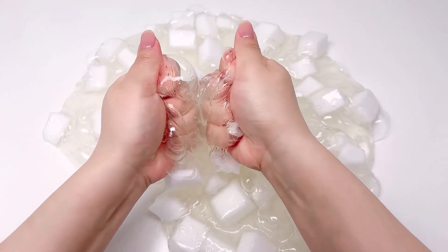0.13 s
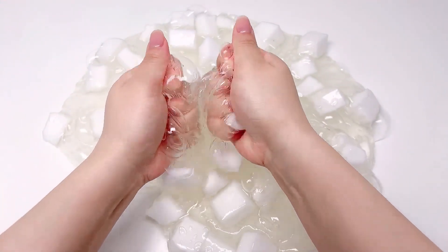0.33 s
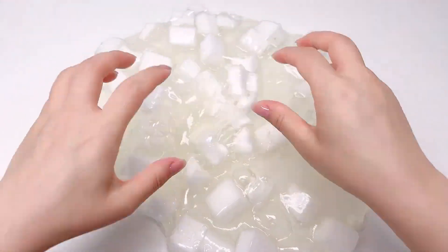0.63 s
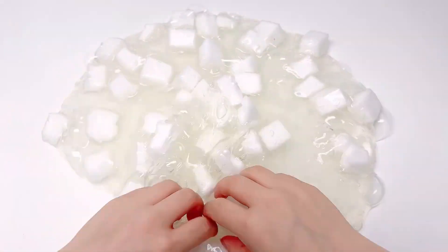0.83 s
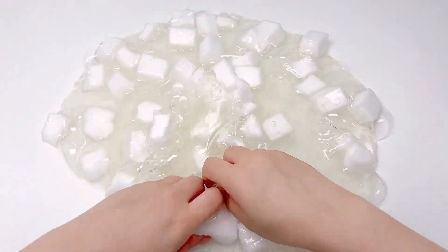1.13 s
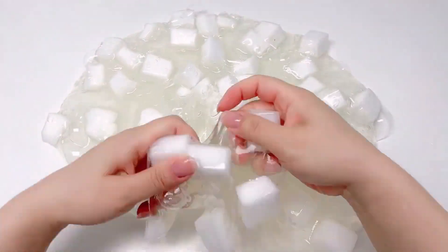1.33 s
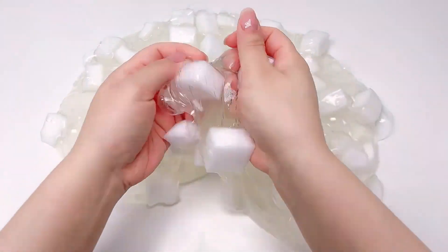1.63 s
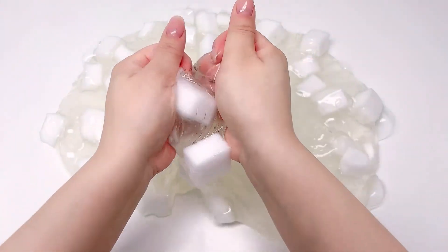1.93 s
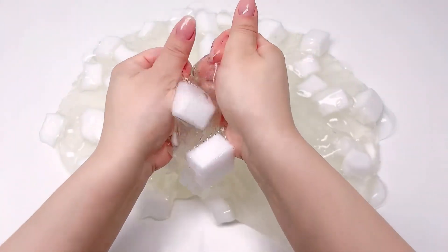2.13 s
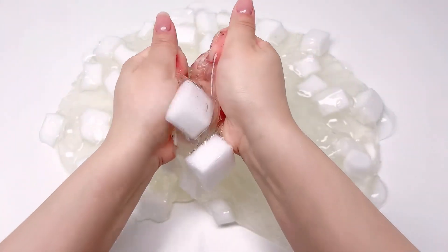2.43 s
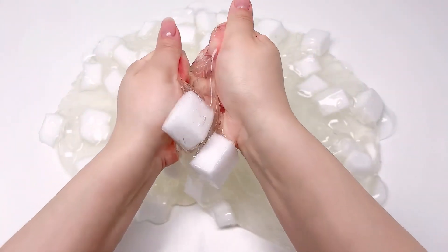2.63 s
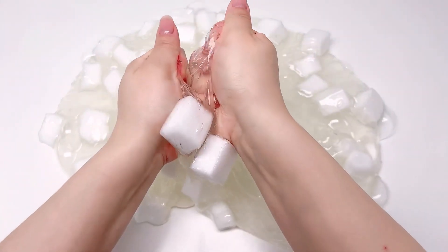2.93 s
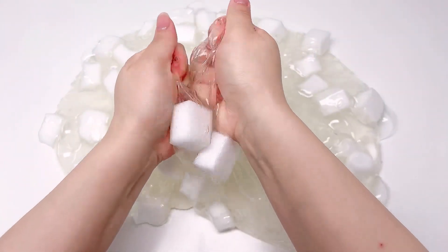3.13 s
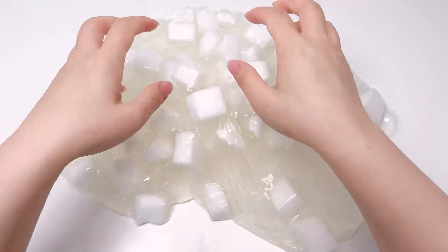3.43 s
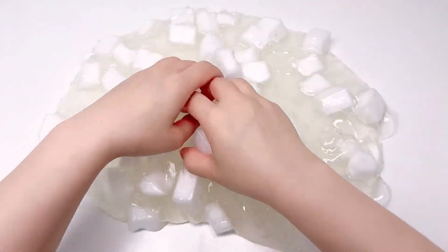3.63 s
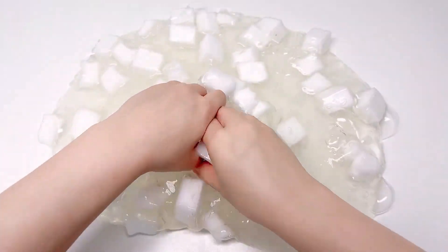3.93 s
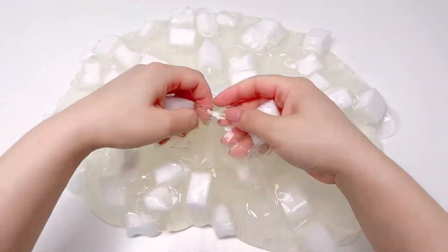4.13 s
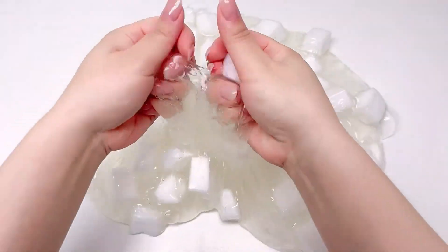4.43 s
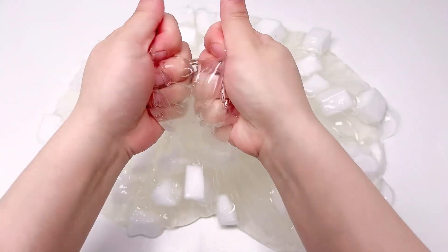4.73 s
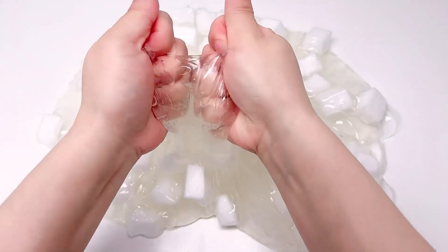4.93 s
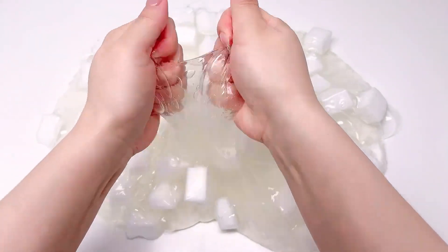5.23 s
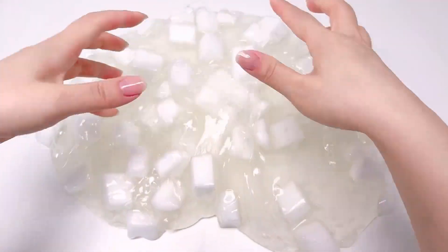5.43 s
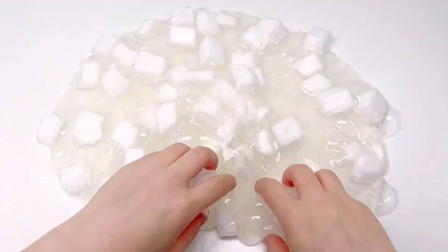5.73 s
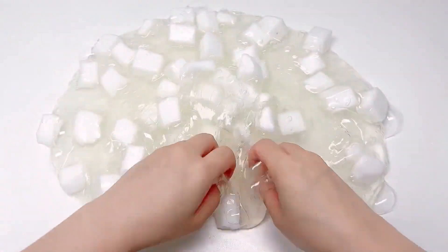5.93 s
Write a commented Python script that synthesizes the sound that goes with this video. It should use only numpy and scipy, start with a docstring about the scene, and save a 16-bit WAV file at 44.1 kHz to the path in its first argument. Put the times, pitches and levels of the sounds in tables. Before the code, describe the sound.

A wet, fizzing squelch opens as hands crush sponge pieces full of slime, heard close in a small, quiet room. Faint sticky crackles, little pops and dull finger bumps on the table follow. A second squeeze spits and pops sharply, then after another lull a third swells with bubbly chirps and hiss. A couple of pops and soft knocks finish it, with faint room hum underneath.

```python
"""Two hands squeeze slime-soaked sponge cubes over a table, close up in a small room.
0-0.6 s: a squeeze forces air through the wet foam; it hisses, sputters and whistles in the hollows
between the fingers, and slime bubbles burst. Then slime clings and ticks, fingers knock the table.
2.3-3.4 s: second squeeze, then another lull of cling, pops and knocks. 4.6-5.6 s: third squeeze.
Cling, two pops and two knocks close the scene. Room tone and house rumble run throughout."""
import sys
import numpy as np
from scipy import signal
from scipy.fft import rfft, irfft, next_fast_len
from scipy.io import wavfile
from scipy.ndimage import uniform_filter1d, map_coordinates

SR = 44100
rng = np.random.default_rng(int(sys.argv[2]) if len(sys.argv) > 2 else 0)


def wrap_up_sound(samples):
    """Save the sound to the file named by the first command line argument, as 16-bit audio."""
    columns = np.atleast_2d(samples).T
    # keep every value between -1 and 1, then stretch to whole-number steps
    tamed = np.clip(columns, -1, 1)
    steps = np.round(tamed * 32767).astype(np.int16)
    wavfile.write(sys.argv[1], SR, steps)


N = 267995

# air flow, one list per grip: time_s, flow_db
JET_FLOWS = [
    [(0, -10), (.042, -13), (.088, -16.5), (.098, -13.5), (.145, -17.5)],
    [(.145, -13), (.455, -19.5)],
    [(.455, -22), (.459, -18.5), (.523, -30), (.527, -26), (.581, -55.5), (.62, -44.5)],
    [(2.262, -39), (2.266, -29), (2.318, -43), (2.326, -15), (2.345, -48.5)],
    [(2.345, -47.5), (2.365, -5.5), (2.403, -26), (2.585, -51)],
    [(2.585, -36.5), (2.607, -26), (2.635, -36.5), (2.691, -33.5), (2.698, -18.5)],
    [(2.7, -1), (2.712, -22.5), (2.83, -26.5)],
    [(2.83, -23.5), (2.858, -22), (2.91, -17), (3.136, -23.5), (3.292, -19.5), (3.308, -23.5), (3.318, -41),
     (3.35, -33.5), (3.42, -64.5)],
    [(4.58, -70), (4.588, -43.5), (4.612, -36), (4.686, -25.5), (4.754, -23.5), (4.83, -28.5)],
    [(4.83, -29), (4.85, -17.5), (4.99, -14)],
    [(4.99, -12), (5.06, -13), (5.125, -21.5)],
    [(5.125, -20.5), (5.137, -10.5), (5.167, -20), (5.28, -35.5)],
    [(5.28, -38.5), (5.326, -22), (5.346, -26.5), (5.385, -46.5)],
    [(5.385, -49), (5.407, -16.5), (5.439, -26.5), (5.6, -59)],
]
# jet colour set by foam and grip, one list per jet: freq_hz, density_db
JET_SPECTRA = [
    [(180, -64.5), (300, -33.5), (1450, -15.5), (1660, -5), (1890, -21.5), (2200, -16), (2860, -2.5),
     (4260, -25.5), (10300, -19), (15800, -21.5)],
    [(180, -50.5), (300, -20.5), (545, -20.5), (974, -5.5), (1500, -6.5), (1710, -3.5), (2160, -5.5),
     (2910, 1), (6140, -4.5), (6560, -2), (12700, -6), (14500, -2.5), (15800, -1.5)],
    [(180, -64), (300, -29.5), (1450, -5.5), (1680, -12), (2200, -23), (3060, 0), (3490, -9.5),
     (7370, -14.5), (15800, -12)],
    [(180, -56), (300, -26), (1550, -25.5), (1920, -20), (3160, 3), (3730, -18.5), (11000, -6.5),
     (15800, -40.5)],
    [(180, -47.5), (300, -15), (425, -11), (462, -18), (510, -12), (1270, -22.5), (3860, -5.5), (4190, -15),
     (4950, -7.5), (15800, -33)],
    [(180, -59), (300, -27), (372, -19), (554, -16), (853, 7), (1060, 1.5), (2630, 7), (8990, -7),
     (15800, 4)],
    [(180, -46.5), (300, -11), (676, -13), (825, -10.5), (1060, -0.5), (1190, -2.5), (2160, -13.5),
     (3380, -6), (15800, -15.5)],
    [(180, -59), (300, -28), (469, -25), (665, -4), (812, -1.5), (1360, -0.5), (2200, -6), (3210, -2.5),
     (7250, -13.5), (14800, -15.5), (15800, -16)],
    [(180, -50.5), (300, -27.5), (469, -43), (825, -24.5), (2230, -29), (2470, -19.5), (3380, -17),
     (4260, -12), (6560, -26.5), (7130, -24.5), (15800, -28)],
    [(180, -65), (300, -27.5), (1190, -9.5), (1400, -14), (1740, -8), (2160, -14), (2820, -4.5),
     (3160, -10.5), (5940, -10.5), (10300, -7), (15800, -18)],
    [(180, -57), (300, -14), (772, -15), (958, -10), (1170, -13), (1710, -7.5), (3380, -9), (3860, -11),
     (4550, -15.5), (7740, -6), (15800, -12)],
    [(180, -69), (300, -43), (425, -11), (536, -25.5), (723, -14), (1520, -12.5), (3160, -5.5), (4190, -8),
     (15800, -12.5)],
    [(180, -58), (300, -40), (1060, -21.5), (1660, -13), (1950, -11.5), (2820, -2.5), (4550, -21),
     (10100, -16.5), (15800, -22.5)],
    [(180, -41), (300, -29), (536, -25.5), (1450, -8), (1920, -19.5), (2860, -5), (3110, -9.5),
     (7370, -3.5), (15800, -19.5)],
]
# treble change from start to end, one per jet: drift_db
JET_DRIFTS_DB = [1.5, 1.5, -2.5, -1, -7, -5, -1.5, -6.5, 5, 2.5, 3, -2.5, 1.5, -5]
# hollows between the fingers, one list each: time_s, pitch_hz, level_db
FINGER_HOLLOWS = [
    [(0, 2880, -17), (.046, 2937, -12.5), (.076, 2890, -21.5), (.098, 2874, -13.5), (.138, 2960, -5.5),
     (.148, 2862, -45)],
    [(0, 1648, -20.5), (.114, 1654, -20.5), (.182, 1720, -41.5), (.315, 1676, -40), (.324, 1695, -23),
     (.34, 1723, -40), (.455, 1735, -44), (.462, 1710, -20), (.485, 1709, -35), (.495, 1674, -22),
     (.52, 1620, -33)],
    [(0, 10300, -25.5), (.075, 10560, -21.5), (.09, 10500, -35.5), (.11, 10150, -19), (.155, 10500, -23)],
    [(2.265, 5710, -24.5), (2.272, 4710, -30.5), (2.282, 3220, -31.5), (2.3, 3064, -30), (2.325, 2480, -36)],
    [(2.71, 792, -19.5), (2.758, 846, -35), (2.788, 1114, -49), (2.956, 1011, -28.5), (3.036, 919, -29.5),
     (3.114, 1096, -35)],
    [(4.585, 3040, -42.5), (4.635, 2375, -37.5), (4.66, 2572, -24.5), (4.7, 2774, -21), (4.75, 2367, -37)],
    [(4.6, 3400, -32), (4.635, 4080, -23.5), (4.655, 4318, -17), (4.675, 3900, -12), (4.695, 4480, -20.5),
     (4.76, 3740, -41)],
    [(4.585, 4000, -42.5), (4.61, 6450, -27), (4.67, 6410, -27), (4.71, 5180, -25), (4.76, 4900, -47)],
    [(4.9, 11000, -20.5), (4.93, 10000, -19), (4.96, 8500, -22.5), (5.0, 7900, -22.5)],
    [(5.055, 9200, -14.5), (5.068, 7800, -10), (5.08, 5940, -20), (5.092, 4830, -17)],
]
# pockets that open and shut: peak_s, rise_s, fall_s, first_hz, last_hz, level_db
POCKET_CHIRPS = [(.004, 0.0036, .06, 1056, 1280, -20.5), (.12, .15, .12, 3450, 3250, -20),
                 (.25, 0.22, .2, 5236, 5200, -27), (.555, .03, 0.015, 1038, 1050, -32.5),
                 (2.21, 0.045, 0.082, 4550, 6800, -44), (2.3, 0.027, 0.026, 2900, 1600, -29.5),
                 (2.367, 0.0058, 0.011, 4990, 5100, -7), (2.39, 0.018, .2, 4960, 4950, -31.5),
                 (2.703, .003, 0.0065, 810, 814, -7), (3.264, .04, 0.022, 749.5, 686, -22.5),
                 (4.63, .04, .07, 5600, 5200, -27.5), (4.701, 0.072, .06, 5600, 4700, -24.5),
                 (4.67, .06, .07, 3300, 3500, -26.5), (4.826, .006, 0.0092, 2200, 2294, -18.5),
                 (4.79, .05, .05, 8250, 8200, -22.5), (4.848, .03, 0.007, 2495, 2450, -7),
                 (4.845, 0.017, .004, 3510, 3050, -10), (4.87, 0.027, .05, 7430, 6200, -17.5),
                 (4.866, 0.0057, .08, 3768, 3700, -19.5), (4.893, 0.0023, 0.043, 1745, 2050, -23),
                 (4.905, .03, 0.047, 693.1, 1150, -23.5), (4.968, 0.049, .006, 1110, 1260, -20.5),
                 (4.96, 0.066, .015, 1200, 1800, -22.5), (4.978, .1, .06, 2845, 2880, -15),
                 (4.999, .003, .02, 873, 1300, -18), (5.0, .004, 0.065, 1744, 1500, -21.5),
                 (5.036, .01, 0.027, 1657, 1800, -15), (5.04, 0.014, .06, 1297, 1580, -19),
                 (5.04, 0.1, 0.067, 439, 650, -40), (5.055, 0.11, .01, 9350, 9150, -14),
                 (5.058, .016, 0.023, 2930, 2780, -11.5), (5.068, .014, .03, 3860, 3920, -9),
                 (5.07, .005, 0.085, 15000, 10000, -21.5), (5.133, .006, .006, 1707, 3370, -6),
                 (5.14, .005, 0.019, 3165, 3180, -8), (5.32, .08, 0.045, 2840, 2760, -30),
                 (5.393, .003, .025, 1414, 1450, -31), (5.432, .006, 0.017, 1640, 1350, -23),
                 (5.925, .05, .04, 1437, 1440, -33)]
# bursting bubbles: start_s, level_db, pocket_hz, body_db, crack_db (last two relative to level_db)
BUBBLE_POPS = [(.099, -5, 2920, -16.5, -15.5), (.459, -14.5, 1730, -7.5, -20), (.46, -12.5, 2990, -20, -14),
               (.528, -11.5, 7580, -20, 2), (.66, -30.5, 8350, -9.5, -6), (.687, -23, 6690, -24.5, -18.5),
               (.746, -29.5, 3840, 1, -9.5), (.763, -28.5, 3620, 3.5, -3.5), (1.075, -21.5, 6220, -11, -16),
               (1.121, -29.5, 760, 1.5, -4), (1.159, -34, 988, -10, -24.5), (1.227, -37, 5290, -1, -14.5),
               (1.255, -32.5, 2514, -9, -19.5), (1.345, -31.5, 5600, 5, -9),
               (1.353, -21.5, 1589, -3.5, -20.5), (1.366, -27, 1500, -5, -10),
               (1.503, -38, 6000, -8, -15.5), (1.536, -35.5, 2490, -10, -20),
               (1.635, -35.5, 1874, 10.5, -14), (1.735, -31.5, 1417, -7.5, -23.5),
               (1.831, -33, 3793, 4.5, -17), (1.864, -30, 4040, -1.5, -24.5),
               (1.974, -31.5, 1880, -11, -17), (2.065, -19.5, 5960, -6, -18),
               (2.133, -17, 6200, -21.5, -14), (2.187, -24.5, 8480, -16.5, 1), (2.266, -17, 5600, 1, -20),
               (2.325, -9.5, 3950, 8.5, -5), (2.357, -12.5, 2940, -1.5, -4), (2.363, -1, 4997, -7.5, -4),
               (2.588, -19.5, 6080, -4.5, -2.5), (2.604, -11.5, 3147, -11.5, -26.5),
               (2.699, -11.5, 844, -15, 3.5), (2.832, -1, 1810, 3, 4.5), (2.892, -5.5, 2662, -1, -3.5),
               (2.902, -3.5, 3125, -22.5, 4), (3.224, -11.5, 1663, -18.5, -25.5),
               (3.304, -2.5, 7160, -26, -19), (3.349, -10.5, 3941, -34, -26), (3.493, -31, 1065, -1, -21),
               (3.523, -27.5, 1050, 0, -8), (3.764, -34.5, 1990, -19, -11.5), (3.78, -36, 920, 7, 9.5),
               (3.866, -24, 910, -16, -27.5), (3.936, -29.5, 3900, -20, -19), (4.04, -38, 3510, -18, -23),
               (4.098, -40.5, 2500, 9.5, -21.5), (4.164, -30, 3410, 2, -15), (4.238, -38, 942.2, 4, 0),
               (4.297, -37.5, 2060, 6, -19), (4.378, -35, 3010, 4.5, -18.5),
               (4.419, -32.5, 9750, -14, -2.5), (4.49, -34.5, 6736, -3, -5.5), (4.596, -27, 5110, -25, -4),
               (4.61, -19.5, 2950, -23, -14), (4.684, -9.5, 4440, -17, -22),
               (4.835, -12, 2500, -5.5, -21.5), (4.847, -5, 2406, -17.5, -22), (5.13, -20, 3160, 7, -14.5),
               (5.296, -26.5, 2860, -15, -19), (5.316, -24, 2890, -10, -14), (5.34, -28.5, 2750, 10, -14.5),
               (5.396, -10, 9300, -11, -17.5), (5.408, -17.5, 6180, -11, -24.5),
               (5.466, -15, 2920, -21.5, -18.5), (5.602, -12.5, 1784, -4, -14.5),
               (5.881, -11.5, 580, 3.5, -29)]
# fingers meeting the table: start_s, level_db, contact_ms
FINGER_KNOCKS = [(0.768, -22, 7.9), (0.983, -37, 2.9), (1.075, -29.5, 6.9), (1.127, -39.5, 0.73),
                 (1.357, -30, 5.5), (2.325, -27, 1.2), (3.552, -20.5, 11), (3.872, -30.5, 4.2),
                 (5.603, -17, 5), (5.885, -15, 1.6)]
# table top modes: freq_hz, level_db, t60_s
TABLE_MODES = [(76, -19.5, .15), (115.78, -2, 0.19), (191.04, -10.5, 0.32), (254, -4, 0.27135),
               (351, -7, 0.12), (523, -6, 0.22)]
# slime pulling off skin, one list per lull: time_s, level_db, treble_db
CLING_SPANS = [
    [(.5, -37.5, 0), (.78, -49, -9.5), (.908, -57.5, -6.5), (1.2, -47, -6), (1.934, -51.5, -8.5),
     (2.072, -66.5, 10), (2.27, -46, -8)],
    [(3.36, -46.5, 14.5), (3.552, -50, -5.5), (3.77, -68.5, 5), (4.016, -53, -2.5), (4.6, -54.5, 1)],
    [(5.5, -43.5, 5.5), (5.668, -62, 8), (5.998, -47, -13), (6.077, -56, -8.5)],
]
# colour of that rustle: freq_hz, density_db
CLING_SPECTRUM = [(290, -11), (500, -26.5), (783, 2.5), (1170, -1), (1460, 1), (1610, -62.5), (1680, -0.5),
                  (3890, -5), (15800, -9.5)]
# room decay: freq_hz, t60_s
ROOM_DECAY = [(200, 0.43), (2000, 0.3), (6000, .28), (14000, 0.14)]
# house rumble envelope: time_s, level_db
RUMBLE_LEVELS = [(0, -44), (.44, -48.5), (.83, -45), (2.05, -48), (2.35, -44.5), (3.08, -46), (3.52, -48.5),
                 (3.7, -41.5), (4.37, -42), (4.7, -53), (4.99, -43), (5.3, -48), (6.08, -40)]
# house rumble colour: freq_hz, density_db
RUMBLE_SPECTRUM = [(12, -38.5), (20, -17.5), (48, 6), (62, 0), (80, -13.5), (110, -7), (140, -27),
                   (240, -120)]
# room tone colour: freq_hz, density_db
TONE_SPECTRUM = [(53, -18.5), (90, -5.5), (151, -3.5), (238, -10), (375, -0.5), (466, -10), (971, -17),
                 (2160, -26.5), (3190, -25), (7250, -30.5), (11900, -56), (14500, -36.5), (15800, -25.5)]

TREBLE_DB_PER_FLOW_DB = .03
CHIRP_SWELL_DB = 19.5  # peak above both ends
BLIPS_PER_S, BLIP_FALL_S, BLIP_MAX_DB = 60, .03, -14.5  # level relative to flow
POP_T60_S, FIZZ_T60_S, FIZZ_DB = .022, .38, -22.5  # level relative to splat
TONE_DB, TOP_HZ = -51, 15900


def jets():
    """Air driven out of the foam; stronger flow hisses brighter."""
    out = np.zeros(N)
    for rows, spectrum, drift_db in zip(JET_FLOWS, JET_SPECTRA, JET_DRIFTS_DB):
        start, flow_db = curves(rows)
        size = len(flow_db)
        treble_db = TREBLE_DB_PER_FLOW_DB * (flow_db - flow_db.max())
        treble_db += drift_db * np.linspace(-.5, .5, size)
        hiss = coloured(sputter(size, spit_db=1, patchy_db=3, snap_gain=4.4), spectrum)
        out[start:][:size] += amp(flow_db) * brightened(hiss, treble_db) * edge_fade(size)
    return out


def whistles():
    """Turbulence in hollows and pockets: narrow noise around a pitch set by their size."""
    out = np.zeros(N)
    chirps = [chirp_track(*row) for row in POCKET_CHIRPS + blips()]
    for rows in FINGER_HOLLOWS + chirps:
        start, pitch_hz, level_db = curves(rows)
        size = len(pitch_hz)
        width_hz = 70 * (np.mean(pitch_hz) / 3000) ** 1.6  # small hollows whistle less purely
        drive = filtered(rng.standard_normal((2, size)), lambda hz: 1 / (1 + (hz / width_hz) ** 2))
        gate = amp(4 * np.tanh(7 * wobble(size, 70)))  # a slime film shuts and reopens the mouth
        phase = 2 * np.pi * np.cumsum(pitch_hz * (1 + .015 * wobble(size, 120))) / SR
        whistle = drive[0] * np.cos(phase) + drive[1] * np.sin(phase)
        out[start:][:size] += amp(level_db) * unit_rms(gate * whistle) * edge_fade(size)
    return out


def chirp_track(peak_s, rise_s, fall_s, first_hz, last_hz, level_db):
    """A pocket opens and shuts: one swell on a linear glide, rows as in FINGER_HOLLOWS."""
    peak_hz = first_hz + (last_hz - first_hz) * rise_s / (rise_s + fall_s)
    end_db = level_db - CHIRP_SWELL_DB
    return [(peak_s - rise_s, first_hz, end_db), (peak_s, peak_hz, level_db),
            (peak_s + fall_s, last_hz, end_db)]


def blips():
    """Small pockets chirp at random while air flows; rows as in POCKET_CHIRPS."""
    rows = []
    for jet in JET_FLOWS:
        time_s, flow_db = np.transpose(jet)
        span_s = time_s[-1] - time_s[0]
        for when, pitch, glide, softness in rng.random((int(BLIPS_PER_S * span_s), 4)):
            peak_s = time_s[0] + when * span_s
            first_hz = 800 * 6.5 ** pitch
            last_hz = first_hz * (.85 + .4 * glide)
            level_db = np.interp(peak_s, time_s, flow_db) + BLIP_MAX_DB - 8 * softness
            rows.append((peak_s, BLIP_FALL_S / 3, BLIP_FALL_S, first_hz, last_hz, level_db))
    return rows


def pops():
    """A film tears with a crack and a wet splat; the pocket rings, the torn slime fizzes on."""
    out, t = np.zeros(N + SR), np.arange(SR // 4) / SR
    body_band = signal.butter(2, [700, 5000], "band", fs=SR)
    crack_band = signal.butter(2, [6000, 14000], "band", fs=SR)
    pop_env = amp(-60 * t / POP_T60_S) * (1 - np.exp(-t / .00065))
    fizz_env = amp(FIZZ_DB - 60 * t / FIZZ_T60_S) * (1 - np.exp(-t / .0027))
    for start_s, level_db, pocket_hz, body_db, crack_db in BUBBLE_POPS:
        noise = rng.standard_normal((3, len(t)))
        smear_rad = np.cumsum(noise[0]) * .22 * (pocket_hz / 3000) ** .54  # the mouth wobbles
        ring = np.sin(2 * np.pi * pocket_hz * t + smear_rad)
        splat = amp(body_db) * signal.lfilter(*body_band, noise[1])
        splat += amp(crack_db) * signal.lfilter(*crack_band, noise[2])
        pop = pop_env * (ring + splat) + fizz_env * splat
        out[round(start_s * SR):][:len(t)] += amp(level_db) * pop
    return out[:N]


def knocks():
    """Fingers ring the table's modes; a long, soft contact leaves the upper ones quiet."""
    out, t = np.zeros(N + SR), np.arange(SR // 2) / SR
    attack = 1 - np.exp(-t / .0022)
    for start_s, level_db, contact_ms in FINGER_KNOCKS:
        ring = np.zeros(len(t))
        for hz, mode_db, t60_s in TABLE_MODES:
            decay = amp(mode_db + rng.normal(0, 1.2) - 60 * t / t60_s)
            ring += decay * np.sin(2 * np.pi * hz * t) / (1 + (hz * contact_ms / 1000) ** 2)
        out[round(start_s * SR):][:len(t)] += amp(level_db) * ring * attack
    return out[:N]


def cling():
    """Slime threads part from the skin: a faint rustle with tiny dry ticks."""
    out, offsets = np.zeros(N), np.arange(128)
    for rows in CLING_SPANS:
        start, level_db, treble_db = curves(rows)
        size = len(level_db)
        when, pitch, softness, length = np.hsplit(rng.random((size // 300, 4)), 4)
        cycles = 3500 * np.exp(pitch - .5) * offsets / SR
        ticks = amp(-18 * softness) * np.sin(2 * np.pi * cycles) * np.exp(-cycles / (1.2 + 3 * length))
        indices = (when * size).astype(int) + offsets
        ticking = np.bincount(indices.ravel(), ticks.ravel(), size + len(offsets))[:size]
        rustle = coloured(sputter(size, spit_db=3, patchy_db=4), CLING_SPECTRUM)
        peel = brightened(rustle + amp(-23.5) * unit_rms(ticking), treble_db)
        out[start:][:size] += amp(level_db) * peel * edge_fade(size)
    return out


def room(x):
    """Wall reflections: a noise tail, each frequency dying at its own rate."""
    hz, t, bins = signal.stft(rng.standard_normal(SR // 2), SR, nperseg=256)
    decay = amp(-60 * t / log_interp(ROOM_DECAY, hz)[:, None])
    tail = signal.istft(bins * decay, SR, nperseg=256)[1]
    delayed = np.pad(x, (130, 0))
    return signal.fftconvolve(delayed, tail / np.linalg.norm(tail))[:N]


def background():
    """Room tone over an uneven house rumble."""
    _, rumble_db = curves(RUMBLE_LEVELS)
    rumble = filtered(rng.standard_normal(N),
                      lambda hz: amp(log_interp(RUMBLE_SPECTRUM, hz)) * low_cut(hz, 38, order=8))
    tone = coloured(rng.standard_normal(N), TONE_SPECTRUM)
    return amp(rumble_db) * unit_rms(rumble) + amp(TONE_DB) * tone


def sputter(size, spit_db, patchy_db, snap_gain=0.):
    """Noise broken up by wet pores opening and closing, each briefly holding a narrow colour."""
    noise = rng.standard_normal(size) * amp(spit_db * (wobble(size, 600) + 1.1 * wobble(size, 90)))
    noise += snap_gain * rng.standard_normal(size) * (rng.random(size) < 250 / SR)  # pore films snap
    bins = signal.stft(noise, nperseg=256)[2]
    patches = uniform_filter1d(rng.standard_normal(bins.shape), size=3, axis=0)
    patches = uniform_filter1d(patches, size=22, axis=1)
    return signal.istft(bins * amp(patchy_db * unit_rms(patches)), nperseg=256)[1][:size]


def amp(db):
    return 10 ** (np.asarray(db) / 20)


def unit_rms(x):
    return x / np.sqrt(np.mean(x ** 2) + 1e-20)


def log_interp(points, hz):
    knots_hz, values = np.transpose(points)
    return np.interp(np.log(hz + 1), np.log(knots_hz + 1), values)


def curves(rows):
    """Start sample, then a per-sample curve for each column after time_s."""
    time_s, *columns = np.transpose(rows)
    samples = np.arange(round(max(time_s[0], 0) * SR), min(round(time_s[-1] * SR), N))
    return [samples[0]] + [np.interp(samples / SR, time_s, column) for column in columns]


def wobble(size, rate_hz):
    """Smooth curve through random knots."""
    knots = rng.standard_normal(int(size * rate_hz / SR) + 4)
    return map_coordinates(knots, [np.arange(size) * rate_hz / SR])


def edge_fade(size):
    """1.9 ms fade-out; the onset stays hard."""
    return np.minimum(np.arange(size)[::-1] / SR / .0019, 1)


def filtered(x, response):
    """FFT filter with gain response(hz)."""
    size = next_fast_len(x.shape[-1] + 8192)
    return irfft(rfft(x, size) * response(np.fft.rfftfreq(size, 1 / SR)), size)[..., :x.shape[-1]]


def coloured(x, spectrum):
    return unit_rms(filtered(x, lambda hz: amp(log_interp(spectrum, hz))))


def low_cut(hz, corner_hz, order=4):
    return 1 / (1 + (corner_hz / (hz + 1)) ** order)


def brightened(x, treble_db):
    treble = filtered(x, lambda hz: low_cut(hz, 5000))
    return x - treble + amp(treble_db) * treble


def scene():
    """Mono mix; hands and pops also excite the room."""
    hands = jets() + whistles() + cling()
    hands = filtered(hands, lambda hz: low_cut(hz, 250))  # small sources give no bass
    bursts = pops()
    reverb = amp(-11) * room(hands) + amp(-8) * room(bursts)
    return (hands + bursts + reverb + knocks() + background())[None]


def record(dry):
    """Soft clip of the loudest bursts, then a hard band limit."""
    clipped = dry / (1 + np.abs(dry / .94) ** 8) ** (1 / 8)
    return filtered(clipped, lambda hz: hz < TOP_HZ)


dry = scene()
out = record(dry)
wrap_up_sound(out)
```